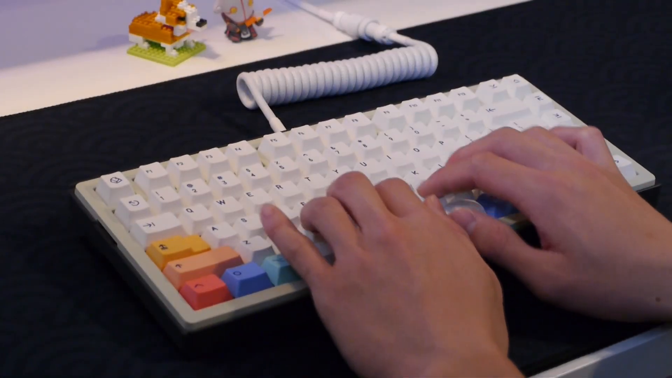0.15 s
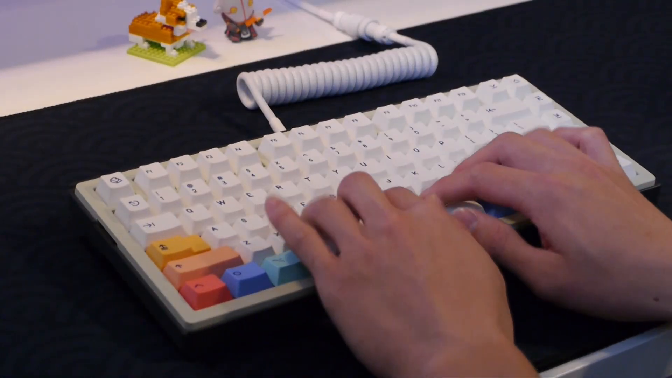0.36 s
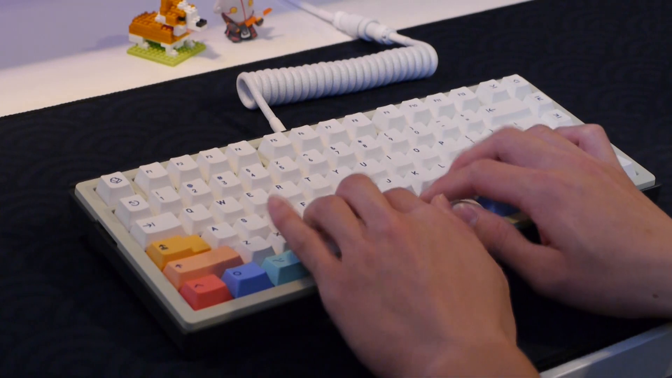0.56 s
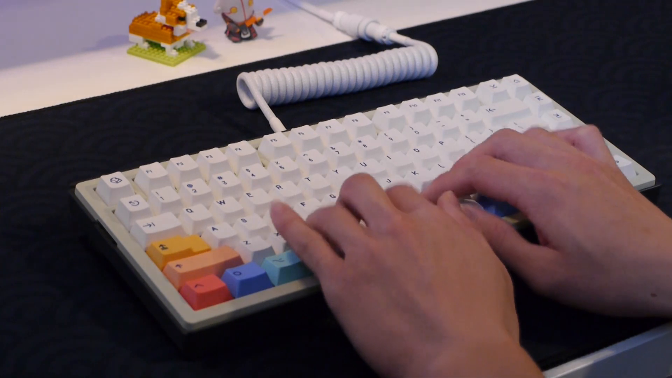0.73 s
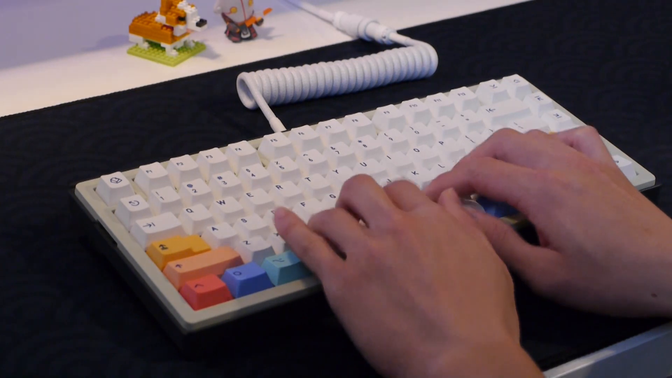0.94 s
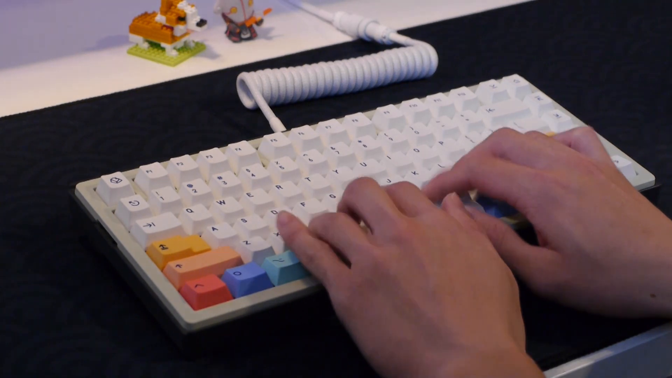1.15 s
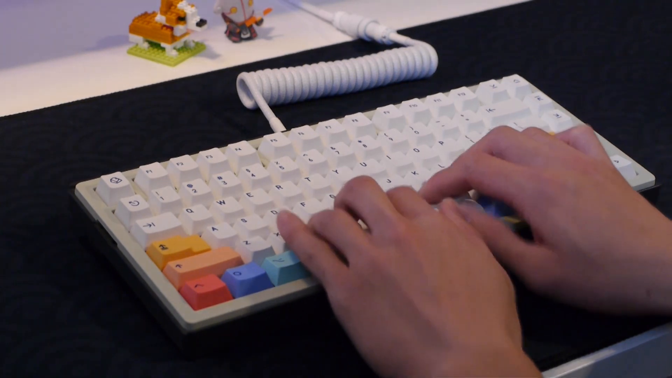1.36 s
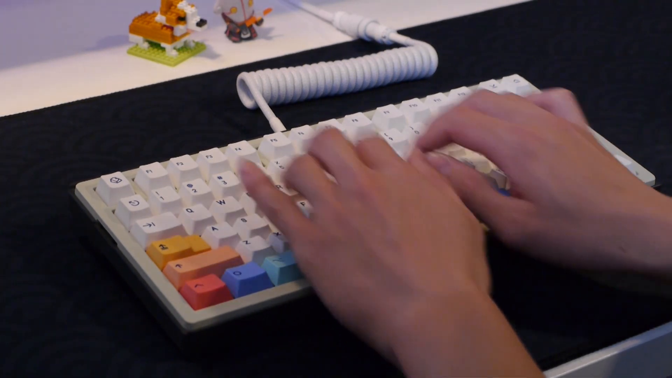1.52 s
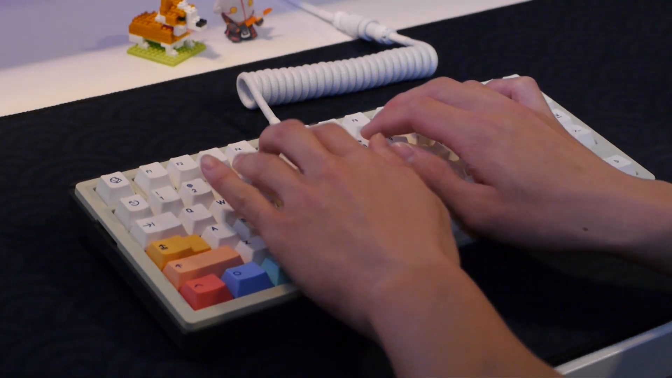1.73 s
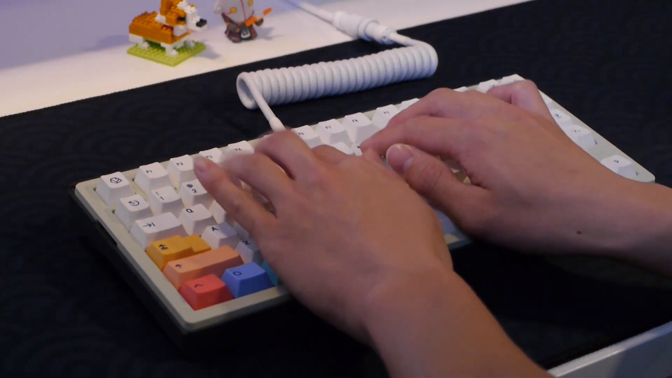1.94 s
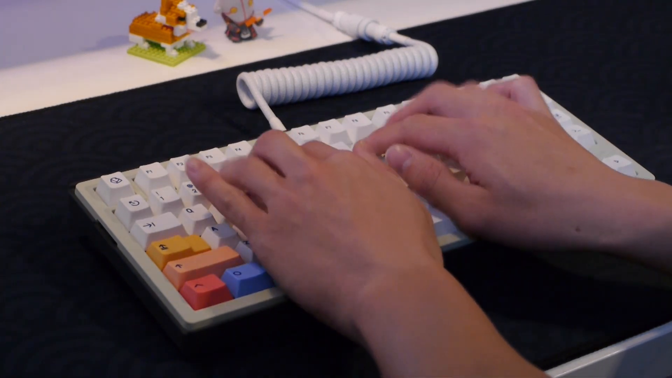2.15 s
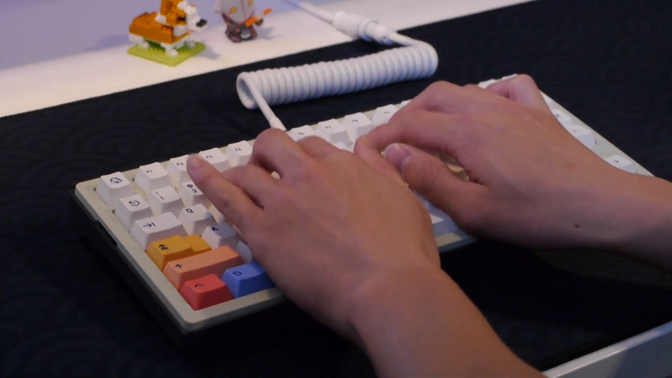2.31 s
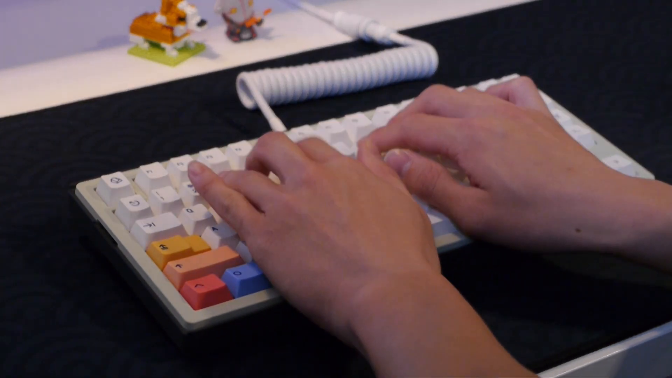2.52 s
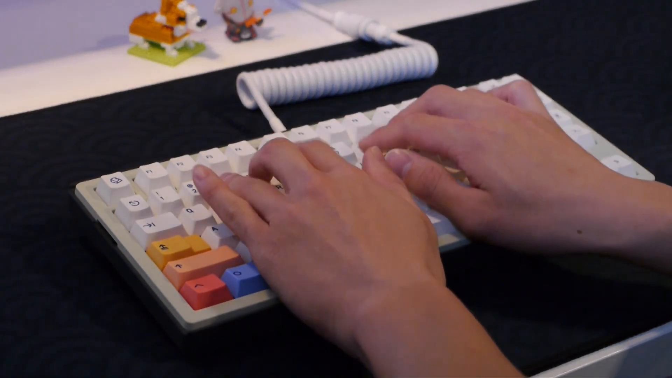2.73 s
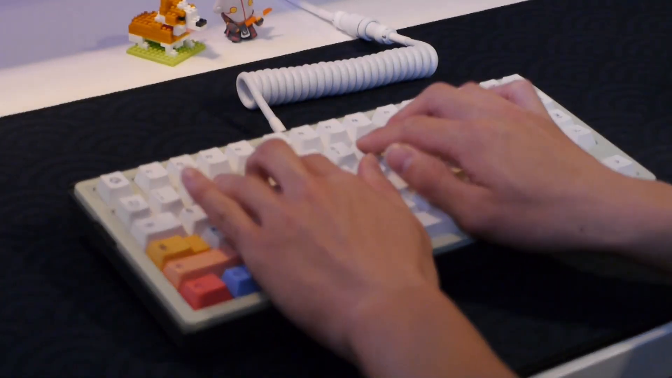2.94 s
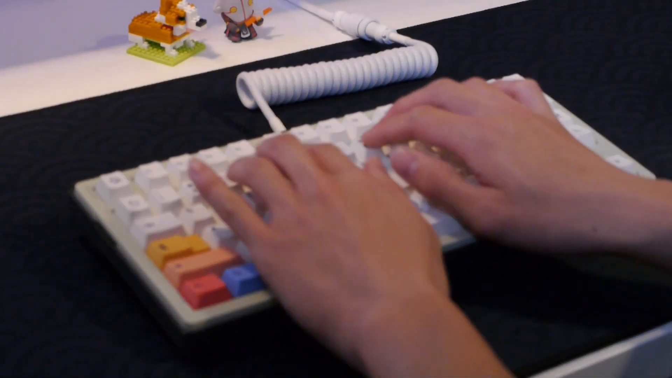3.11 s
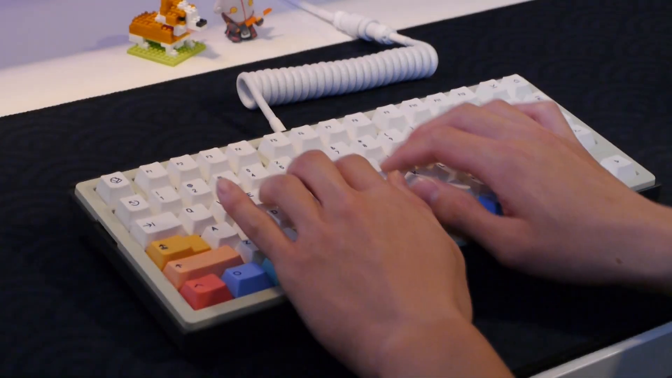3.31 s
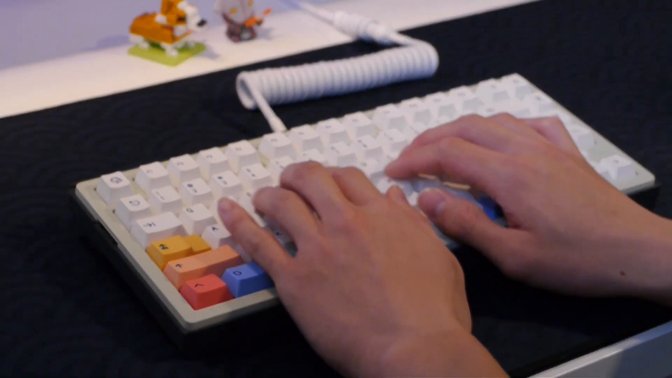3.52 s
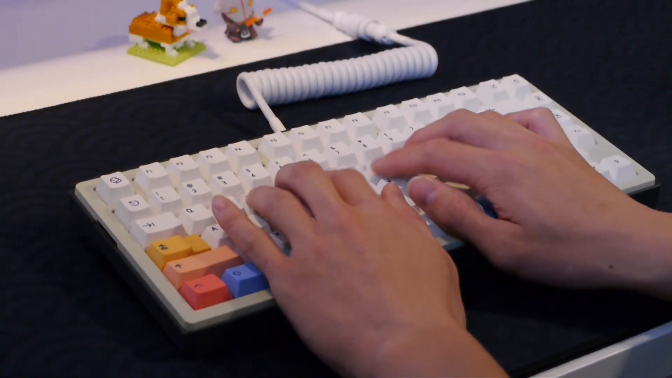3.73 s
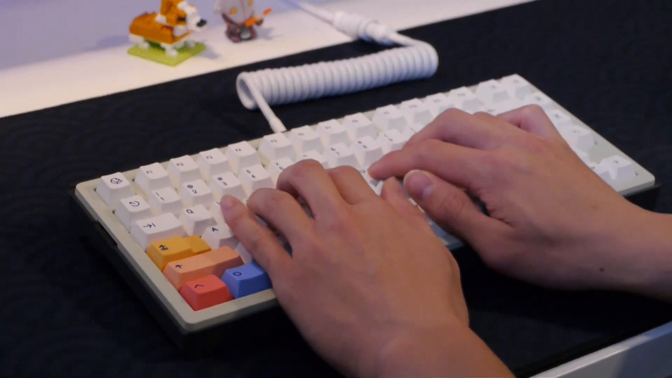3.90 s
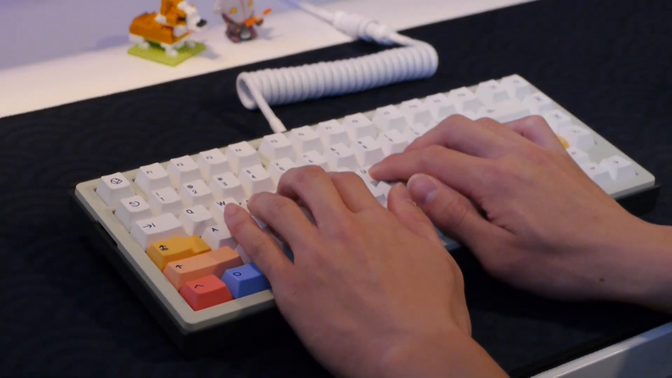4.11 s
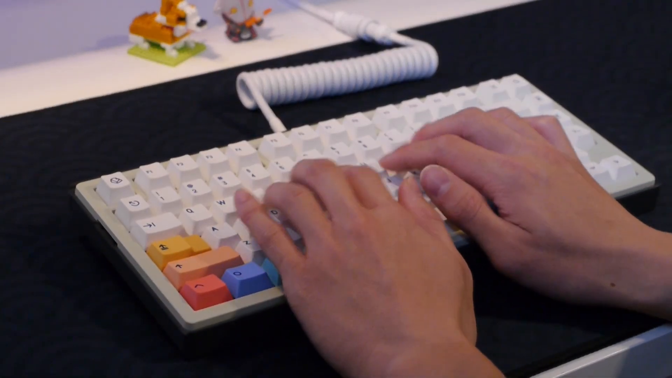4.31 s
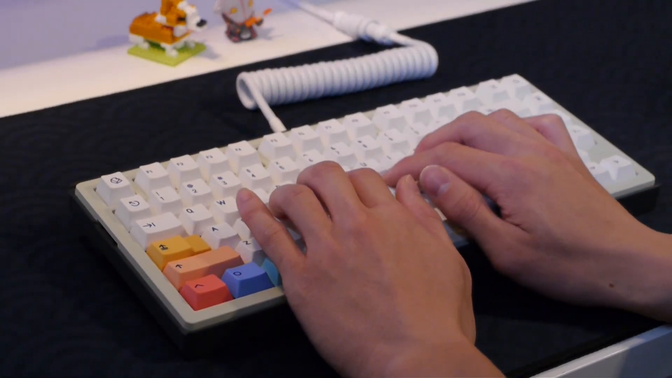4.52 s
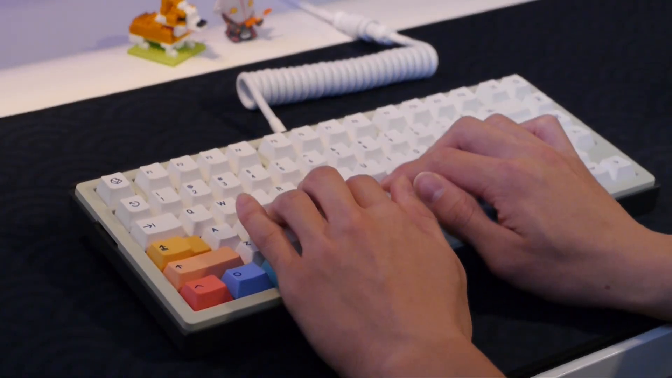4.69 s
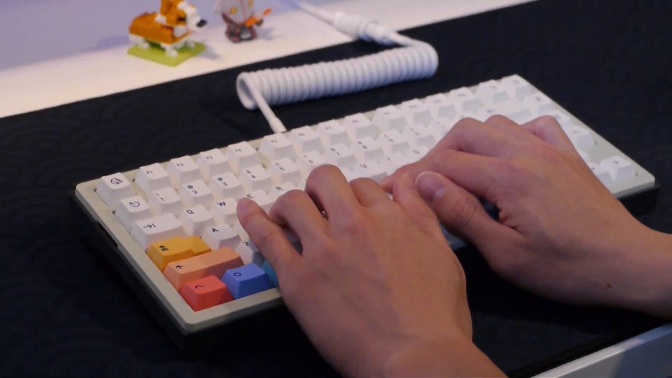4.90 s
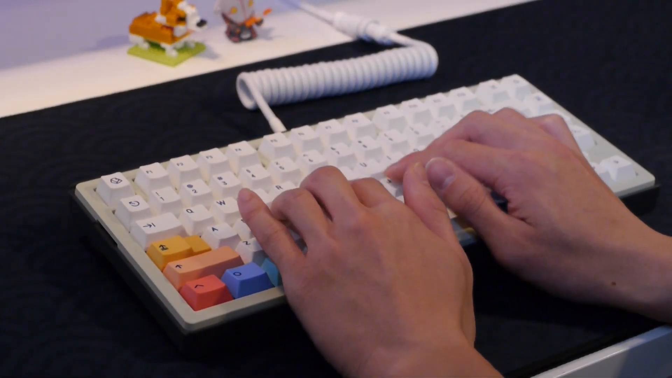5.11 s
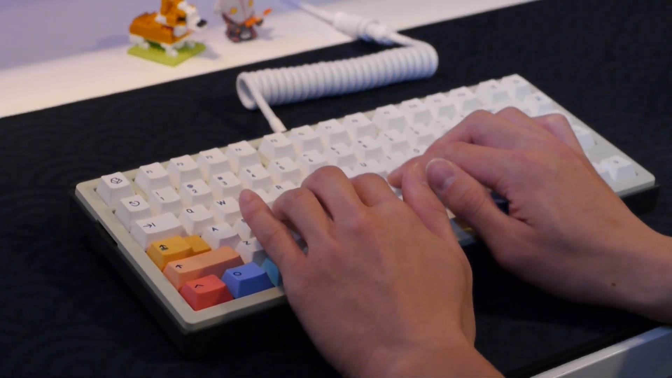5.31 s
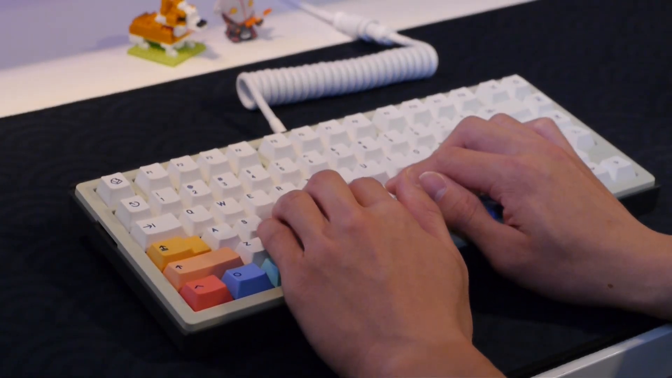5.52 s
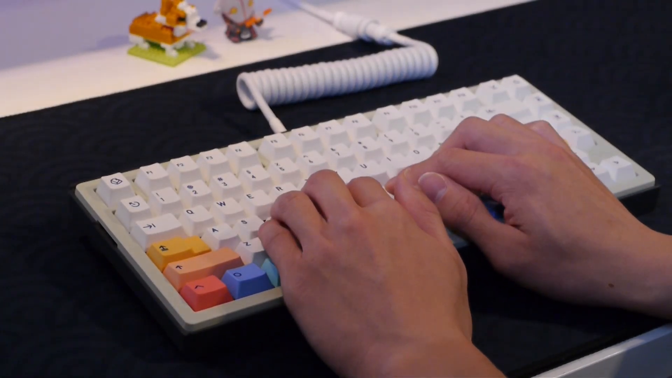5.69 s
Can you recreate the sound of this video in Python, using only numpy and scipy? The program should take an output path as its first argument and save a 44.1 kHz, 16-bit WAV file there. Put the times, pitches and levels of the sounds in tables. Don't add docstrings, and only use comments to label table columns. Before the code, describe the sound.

A damped mechanical keyboard on a desk mat, heard close in stereo in a small room with steady soft hiss and a very faint computer fan hum. After a barely audible finger touch, fast typing starts at about 0.23 s: uneven, short, rounded plastic clacks with tiny gritty ticks, downstrokes mixed with lighter, brighter key returns, running to about 1.5 s. A gap of roughly a third of a second follows. From 1.87 s a denser, louder run pours out, knocks nearly overlapping, with a sharp strong clack near 2.88 s, thinning out by 3.1 s. Then mostly room noise, with faint fingertip and hand brushes. Softer small clusters of clicks come at about 3.75, 4.28, 4.63 and 5.12 s, and a last clear double key-release click at 5.41 s. Each knock dies quickly, with a brief case ring, tight desk and wall reflections and a short room tail.

```python
import sys
import numpy as np
from scipy import signal
from scipy.fft import irfft
from scipy.io import wavfile

SR = 44100
rng = np.random.default_rng(int(sys.argv[2]) if len(sys.argv) > 2 else 0)


def digitize_waveform(pressure):
    field = np.atleast_2d(pressure).T
    bounded = np.clip(field, -1, 1)
    quanta = np.round(bounded * 32767).astype(np.int16)
    wavfile.write(sys.argv[1], SR, quanta)


def convert_level_to_amplitude(level_db):
    exponent = np.asarray(level_db, float) / 20
    return 10 ** exponent


N = 253575


def evened(x):
    return x / np.sqrt(np.mean(x ** 2) + 1e-20)


def read(points, hz):
    f, value = np.transpose(points)
    return np.interp(np.log(hz + 1), np.log(f + 1), value)


def colour(x, points):
    log_gain = np.log(convert_level_to_amplitude(read(points, abs(np.fft.fftfreq(4096, 1 / SR)))))
    taps = np.fft.ifft(np.exp(log_gain - 1j * signal.hilbert(log_gain).imag)).real[:2048]
    return signal.oaconvolve(x, taps)[:len(x)]


def add(mix, s, sound):
    part = mix[round(s * SR):][:len(sound)]
    part += sound[:len(part)]


# (frequency [Hz], level [dB per Hz])
AIR_COLOUR = [(48, -34), (62, -14), (95, -11.5), (125, -4), (195, -1), (256, -5), (382, -2), (850, -6),
              (1020, -8.5), (2910, -18.5), (3470, -23), (8770, -22), (14100, -30.5), (16000, -37)]
# (frequency [Hz], left-right likeness [-1..1])
AIR_LIKENESS = [(60, 0.74), (180, 1), (550, 0.47), (1650, -0.22), (4970, -0.026), (15000, -0.11)]
# (frequency [Hz], left-right difference [dB])
AIR_LEAN = [(60, 1.5), (240, 0.5), (950, 1.0), (3770, 0.0), (15000, -1)]
# (time [s], level [dB], half length [s])
BRUSHES = [(0, 3.5, 0.088), (3.65, 1.5, 0.21), (4.1, .9, 0.19), (5.05, 1.1, 0.074), (5.55, 1.5, .1)]


def air():
    air_db = -51.5
    hz = np.fft.rfftfreq(N, 1 / SR)
    a, b, c, d = rng.standard_normal((4, len(hz)))
    left, other = a + 1j * b, c + 1j * d
    same = np.clip(read(AIR_LIKENESS, hz), -1, 1)
    z = np.array([left, same * left + np.sqrt(1 - same ** 2) * other])
    z *= convert_level_to_amplitude(read(AIR_COLOUR, hz) + np.outer([.5, -.5], read(AIR_LEAN, hz)))
    steady = convert_level_to_amplitude(air_db) * evened(irfft(z, N))

    high_pass = signal.butter(2, 1300, "high", fs=SR, output="sos")
    upper = signal.sosfiltfilt(high_pass, steady)
    t = np.arange(N) / SR
    lift_db = sum(db * np.exp(-((t - s) / half_s) ** 2) for s, db, half_s in BRUSHES)
    return steady + upper * (convert_level_to_amplitude(lift_db) - 1)


# (frequency [Hz], level [dB rms], line width [Hz])
FAN_TONES = [(69.3, -69, 0.74), (189.4, -85, 10.4), (204.5, -67.5, 8.46), (465, -83, 4.5),
             (580, -77.5, 8.9), (643, -67.5, 7.3), (746, -64.5, 14.9)]


def fan():
    t = np.arange(N) / SR
    hum = np.zeros(N)
    for hz, db, width_hz in FAN_TONES:
        wander = np.sqrt(2 * np.pi * width_hz / SR) * np.cumsum(rng.standard_normal(N))
        hum += convert_level_to_amplitude(db) * np.sqrt(2) * np.sin(2 * np.pi * hz * t + wander)
    return hum


# (frequency [Hz], t60 [s])
ROOM_DECAY = [(500, 0.39), (1300, 0.22), (2300, 0.21), (3300, 0.25), (5000, 0.18), (9000, 0.16)]


def room(x):
    taps = np.zeros((2, SR // 2))
    at = np.arange(260, SR // 2 - 16, 16)
    at = at + rng.integers(0, 16, (2, len(at)))
    np.put_along_axis(taps, at, rng.choice([-1., 1.], at.shape), 1)
    taps[1] = 0.72 * taps[0] + 0.61 * taps[1]
    hz, t, z = signal.stft(taps, SR, nperseg=256)
    decay = convert_level_to_amplitude(-60 * t / read(ROOM_DECAY, hz)[:, None])
    tail = signal.istft(z * decay, SR, nperseg=256)[1]
    tail /= np.linalg.norm(tail, axis=1)[:, None]
    return signal.fftconvolve(x[None], tail, axes=1)[:, :N]


# (frequency [Hz], level [dB], t60 [s])
CASE_MODES = [(1540, 13, 0.0081), (1620, 6.5, 0.022), (1884, -5, 0.043), (2030, 2.5, 0.03),
              (2254, -3.5, 0.053), (2400, 1, 0.06), (2487, 12, 0.01), (2793, 1.5, 0.042)]
# (frequency [Hz], level [dB], t60 [s])
TRAY_MODES = [(146, -9.5, 0.12), (302, -8, 0.039), (463, -17, 0.01), (597, -7.5, 0.038), (757, -3.5, 0.044),
              (850, -3, 0.063), (977, -2, 0.043), (1172, 3, 0.021)]


def body_ring(pitch_hz, peak_db, thud_db):
    case_db, tray_db, key_spread_db = -18, -12, 1.5
    pitch_pull_db = 17
    cap_t60_s, rise_s = 0.017, 0.00029
    t = np.arange(3000) / SR
    hz, mode_db, t60_s = np.transpose(CASE_MODES + TRAY_MODES)[:, :, None]
    modes = convert_level_to_amplitude(mode_db - 60 * t / t60_s) * np.sin(2 * np.pi * hz * t)

    near_db = -pitch_pull_db * np.log2(hz[:len(CASE_MODES), 0] / pitch_hz) ** 2
    drive_db = np.r_[case_db + near_db, [tray_db + thud_db] * len(TRAY_MODES)]
    drive_db = peak_db + drive_db + key_spread_db * rng.standard_normal(len(modes))
    ring = (convert_level_to_amplitude(drive_db) * rng.choice([-1., 1.], len(modes))) @ modes

    cap_db = -16.5 - 0.55 * (thud_db - PRESS_THUD_DB)
    ring += convert_level_to_amplitude(peak_db + cap_db - 60 * t / cap_t60_s) * np.sin(2 * np.pi * pitch_hz * t)
    return ring * (1 - np.exp(-t / rise_s))


def stem_tick(level_db):
    tick_t60_s, rise_s, slide_db = .0065, 0.00015, -27
    grit = rng.standard_normal(600)
    tilt = np.clip(0.55 * rng.standard_normal(), -.9, .9)
    grit = evened(grit + tilt * np.roll(grit, 2))
    t = np.arange(len(grit)) / SR
    tick = convert_level_to_amplitude(level_db - 60 * t / tick_t60_s) * grit * (1 - np.exp(-t / rise_s))
    slide = convert_level_to_amplitude(level_db + slide_db) * np.linspace(0, 1, len(grit)) * grit[::-1]
    return tick, slide


def blow(pitch_hz, width):
    turns = np.arange(-2.5, 2.5, pitch_hz / SR)
    bell = np.exp(-(turns / width) ** 2)
    pulse = bell * np.cos(2 * np.pi * turns)
    return pulse - bell * pulse.sum() / bell.sum()


# (delay [s], left level [dB], right level [dB], sign and gain [1])
NEAR_ECHOES = [(.00115, 0, -29, 1), (.0024, -5.5, -11.5, 0.6), (.0029, -15.5, -26, -1),
               (.0039, -9, -9, 0.68), (.0088, -4, -21, 1), (0.0119, -14, -13, -1), (0.014, -35, -28, 1)]
# (delay [s], left level [dB], right level [dB])
WALL_ECHOES = [(.0049, -1.5, -2.5), (.0054, .6, -6)]


def paths_to_microphones(pulse, wall_pulse, tick, wall_db):
    lean_db = -2.2
    direct_db = -1.5
    echo_spread_db, wall_tick_db = 2.5, 3.5
    stretch = 1 + .015 * rng.standard_normal()
    paths = [(0.00006, lean_db / 2, -lean_db / 2, convert_level_to_amplitude(direct_db) * pulse, tick)]
    for delay, left_db, right_db, sign in NEAR_ECHOES:
        key_db = echo_spread_db * rng.standard_normal()
        paths.append((delay * stretch, left_db + key_db, right_db + key_db, sign * pulse, tick))
    for delay, left_db, right_db in WALL_ECHOES:
        paths.append((delay * stretch, left_db + wall_db, right_db + wall_db,
                      wall_pulse, convert_level_to_amplitude(wall_tick_db) * tick))
    return paths


PRESS_THUD_DB, RETURN_THUD_DB, TOUCH_THUD_DB = -5.5, -14.5, 2.3
WALL_OPEN_DB, WALL_HIDDEN_DB, WALL_TOUCH_DB = -2.5, -14, -5

# (time [s], peak level [dB], knock pitch [Hz], stem tick relative level [dB])
PRESSES = [(.2905, -17, 1880, -13), (.3474, -26.5, 1840, -16), (.5396, -25, 1980, -17),
           (.572, -24.5, 1990, -15), (.6431, -24.5, 1840, -8), (.672, -19.5, 1840, -15.5),
           (.7101, -29, 2040, -13), (.8575, -27, 1850, -28), (.8642, -22, 1730, -9.5),
           (.9005, -20, 2000, -16.5), (.9256, -28, 1800, -15), (1.0512, -28, 1530, -28),
           (1.0895, -19.5, 1630, -12), (1.2415, -22.5, 1690, -21), (1.3227, -18, 1770, -19),
           (1.45, -28, 1670, -25), (1.8675, -18, 1720, -20), (1.8829, -15.5, 1900, -14.5),
           (1.9515, -18.5, 1980, -17), (1.9557, -18.5, 1660, -28), (1.9849, -22, 1700, -25),
           (2.0453, -16.5, 1940, -18), (2.0854, -20, 1940, -14.5), (2.1016, -26, 1650, -31),
           (2.138, -17, 1830, -17.5), (2.1643, -17.5, 1860, -23), (2.172, -21, 1540, -30),
           (2.2086, -20.5, 1610, -29), (2.2507, -16.5, 1670, -24), (2.2983, -26, 1560, -22),
                (2.3034, -22, 1780, -31), (2.3119, -24, 1820, -16.5), (2.3389, -17, 1980, -14.5),
                (2.3751, -18, 1830, -25), (2.4393, -18.5, 1850, -22), (2.4679, -19.5, 1820, -18),
                (2.4966, -28.5, 1670, -30), (2.526, -20.5, 1790, -20.5), (2.5353, -22.5, 1760, -16),
                (2.5851, -17.5, 1760, -26), (2.6334, -23.5, 1680, -15), (2.6656, -27, 1540, -20),
                (2.6761, -14.5, 1790, -19.5), (2.7351, -16, 1685, -17.5), (2.8473, -19, 1700, -17.5),
                (2.8731, -34, 1810, -32), (2.9342, -16.5, 2050, -17), (3.0166, -26.5, 1600, -24),
                (3.773, -28.5, 2170, -21), (4.2679, -24, 1490, -22), (4.277, -26, 1630, -21),
                (4.6292, -26.5, 1900, -13.5), (4.6442, -28.5, 2100, -20)]
PRESSES_HIDDEN = [(.242, -20.5, 2400, -15), (.3808, -26, 1760, -22), (.4743, -26.5, 2380, -16),
                  (.6555, -26.5, 2050, -26), (.6855, -26, 1920, -31), (.7938, -19, 1960, -14),
                  (1.0169, -21.5, 1685, -13.5), (1.0651, -24, 1650, -23), (1.1264, -21.5, 1950, -22),
                  (1.1912, -28.5, 2040, -19), (1.4347, -23.5, 1630, -20.5), (1.4948, -24, 1810, -21),
                  (2.0431, -18, 1790, -26), (2.6915, -23.5, 1720, -31), (2.7688, -24, 1790, -13),
                  (2.792, -26.5, 1780, -26), (2.8023, -19, 1550, -27.5), (5.112, -29, 1570, -19),
                  (5.1169, -32, 1720, -25)]
RETURNS = [(.4447, -25, 1830, -4), (.4586, -15.5, 2070, -14), (.465, -31, 2250, -16),
           (.5129, -21.5, 1690, -14), (.752, -26.5, 2360, -14), (.9711, -23, 2240, -19.5),
           (1.1194, -21, 1840, -12), (1.3716, -23.5, 2250, -12.5), (1.3819, -21, 1760, -13.5),
           (1.9029, -43, 1800, -9), (1.9324, -14.5, 2160, -16.5), (2.243, -21.5, 1900, -13),
           (2.8791, -13, 1690, -39), (2.8828, -15, 2320, -16.5), (2.9723, -19, 1780, -21.5),
           (3.0819, -30.5, 1760, -34), (3.7332, -32, 1870, -16), (3.7603, -27, 1750, -14),
           (3.7679, -27, 1940, -31), (3.7856, -29.5, 2280, -28), (4.2847, -23, 1630, -29),
           (4.2883, -29.5, 1640, -33), (4.6342, -24, 1980, -20), (4.6382, -20, 2070, -21),
           (5.108, -30.5, 1340, -29), (5.1286, -31.5, 1540, -28), (5.4065, -21.5, 1790, -18.5),
           (5.4208, -20.5, 1900, -23)]
RETURNS_HIDDEN = [(.2352, -21, 2140, -7.5), (.2868, -30, 1830, -25), (.4475, -22, 2450, -24),
                  (.683, -23.5, 1970, -22), (.7442, -19.5, 2030, -18), (1.1838, -25, 2050, -20),
                  (1.3024, -18.5, 1540, -12), (1.4822, -31.5, 2170, -18.5), (1.9948, -28, 1700, -11),
                  (4.6365, -24.5, 2400, -14), (4.68, -38, 2240, -25), (5.1196, -33, 1600, -28)]
TOUCHES = [(.08, -45, 2200, -18), (.3232, -39, 2000, -8), (.372, -33.5, 1790, -18),
           (.4131, -33.5, 1590, -14), (.4235, -34, 1730, -33), (.602, -31.5, 1680, -24),
           (.6097, -29.5, 1580, -20), (.8401, -33.5, 1850, -15), (.8954, -30, 1850, -27),
           (1.2664, -35, 1570, -14), (1.2789, -33.5, 1520, -8), (1.4431, -29, 1880, -25),
           (2.1785, -30, 1740, -17), (2.2797, -31, 1860, -25), (2.6523, -41, 1630, -17),
           (2.828, -43.5, 1900, 10), (3.0596, -33.5, 1560, -34), (3.073, -32.5, 1480, -23),
           (3.0937, -33, 1460, -21), (3.88, -53.5, 2300, 4), (3.99, -49, 2600, -20),
           (4.149, -46, 2580, -20), (4.5915, -33.5, 1440, -23), (4.6208, -35, 1600, -19),
           (5.1305, -28.5, 1620, -24)]


def every_knock():
    kinds = [(PRESSES, WALL_OPEN_DB, PRESS_THUD_DB),
             (PRESSES_HIDDEN, WALL_HIDDEN_DB, PRESS_THUD_DB),
             (RETURNS, WALL_OPEN_DB, RETURN_THUD_DB),
             (RETURNS_HIDDEN, WALL_HIDDEN_DB, RETURN_THUD_DB),
             (TOUCHES, WALL_TOUCH_DB, TOUCH_THUD_DB)]
    return [(*row, wall_db, thud_db) for rows, wall_db, thud_db in kinds for row in rows]


# (frequency [Hz], level [dB])
TICK_COLOUR = [(2500, -29), (4500, 3), (6000, -1.5), (8000, 3), (9200, 3.5), (11000, 2.5), (13000, -2),
               (15000, -22)]
# (frequency [Hz], level [dB])
RADIATION = [(100, -18), (450, 1.5), (800, -2), (1250, 0.5), (1420, -3), (1540, 0.5), (1750, -5),
             (2030, -0.5), (2500, -3.5), (2950, 1), (3300, -0.5), (3800, -8.5), (5000, 3.5)]


def keys():
    tick_skew = .003
    knocks, ticks = np.zeros((2, 5, N))
    for k, (s, peak_db, pitch_hz, tick_db, wall_db, thud_db) in enumerate(every_knock()):
        width = np.clip(0.32 - .022 * thud_db, .3, .95)
        pulse = convert_level_to_amplitude(peak_db) * blow(pitch_hz, width)
        wall_pulse = convert_level_to_amplitude(peak_db) * blow(pitch_hz * 1.242, np.minimum(width * 1.18, .95))
        tick, slide = stem_tick(peak_db + tick_db)
        ring = body_ring(pitch_hz, peak_db, thud_db)
        start = s - 2.2 / pitch_hz

        for delay, *ear_db, body, edge in paths_to_microphones(pulse, wall_pulse, tick, wall_db):
            for ear in range(2):
                add(knocks[ear], start + delay, convert_level_to_amplitude(ear_db[ear]) * body)
                add(ticks[ear], s + delay * (1 + tick_skew * ear), convert_level_to_amplitude(ear_db[ear]) * edge)
        for ear in range(2):
            add(knocks[ear], s, ring)
            add(ticks[ear], s - len(slide) / SR, np.roll(slide, 7 * ear))

        train = 2 + k % 3
        add(knocks[train], start, pulse)
        add(knocks[train], s, ring)
        add(ticks[train], s, convert_level_to_amplitude(8.0) * np.linalg.norm(tick, keepdims=True))
    sound = np.array([colour(a, RADIATION) + colour(b, TICK_COLOUR) for a, b in zip(knocks, ticks)])
    return sound[:2], sound[2:]


def scene():
    room_db, room_lean_db = -6, 1
    close, trains = keys()
    tails = sum(room(train) for train in trains)
    tail_gain = convert_level_to_amplitude(room_db + np.array([[.5], [-.5]]) * room_lean_db)
    return close + tail_gain * tails + air() + fan()


def band_limit(x):
    return signal.sosfilt(signal.butter(12, 16490, fs=SR, output="sos"), x)


def record(dry):
    bass_cut = signal.butter(1, 40, "high", fs=SR, output="sos")
    mix = signal.sosfiltfilt(bass_cut, dry)
    mix = signal.oaconvolve(mix, signal.firwin(255, 16100, fs=SR)[None], "same")
    return band_limit(mix)


dry = scene()
out = record(dry)
digitize_waveform(out)
```